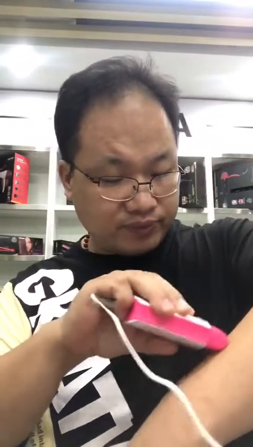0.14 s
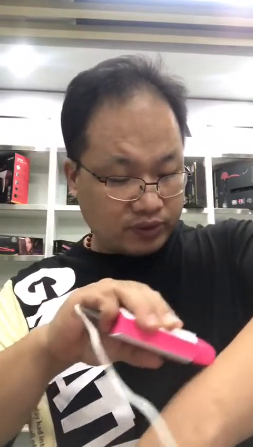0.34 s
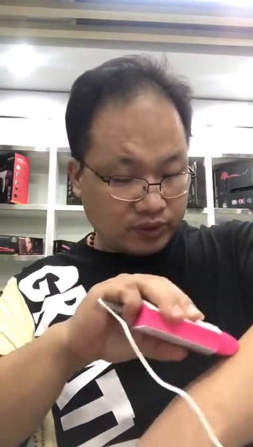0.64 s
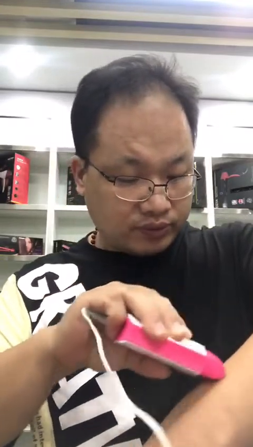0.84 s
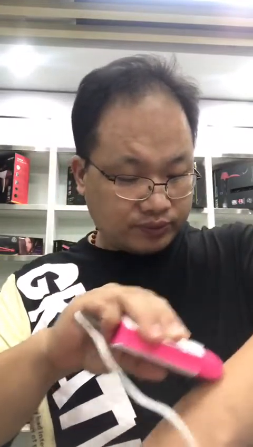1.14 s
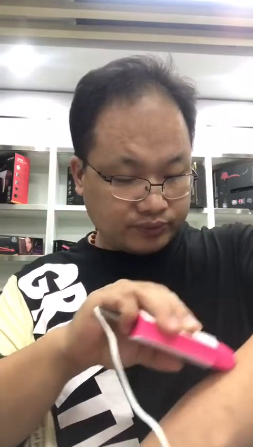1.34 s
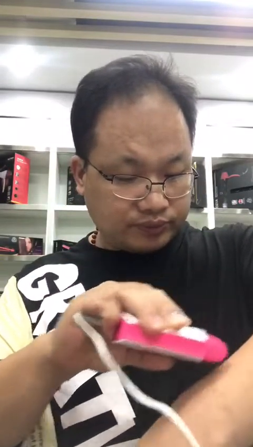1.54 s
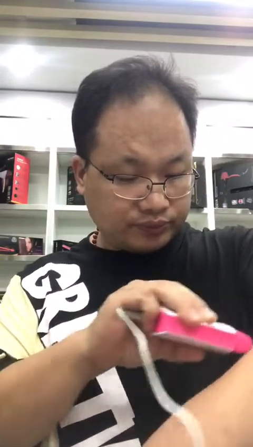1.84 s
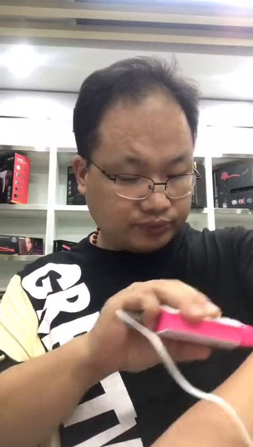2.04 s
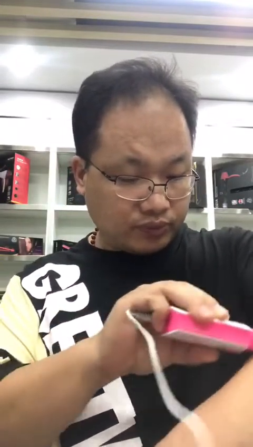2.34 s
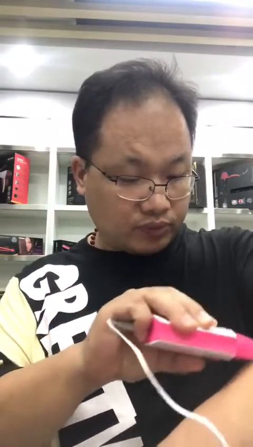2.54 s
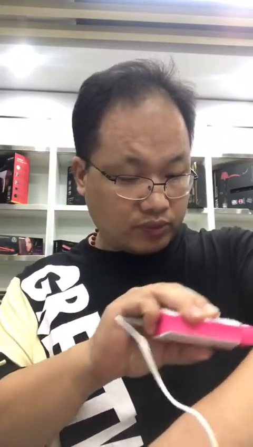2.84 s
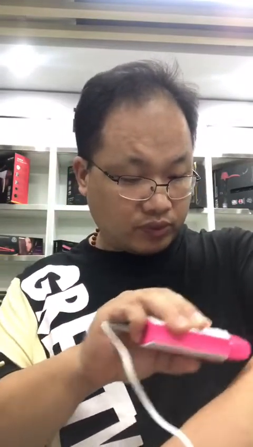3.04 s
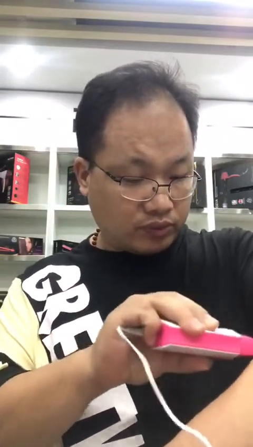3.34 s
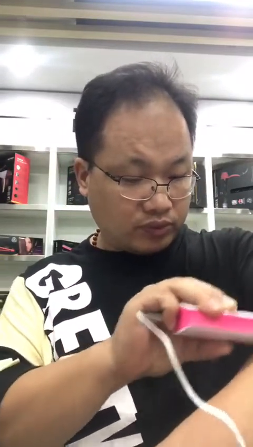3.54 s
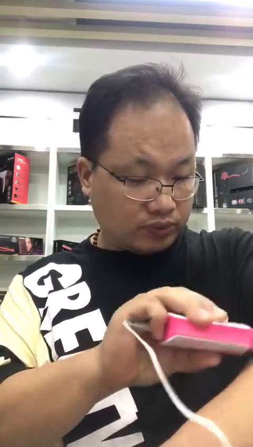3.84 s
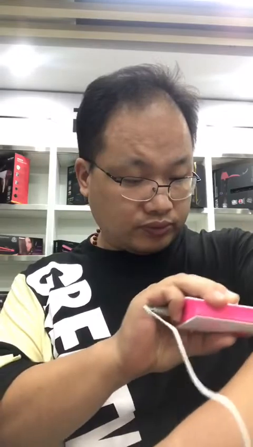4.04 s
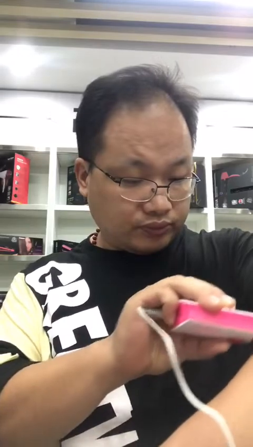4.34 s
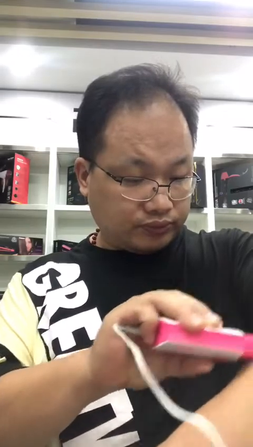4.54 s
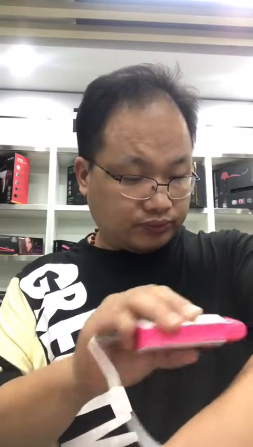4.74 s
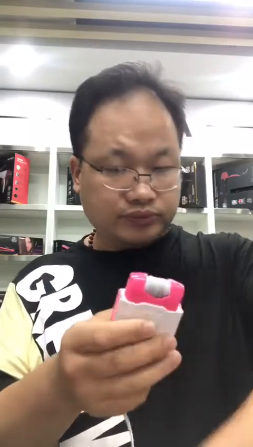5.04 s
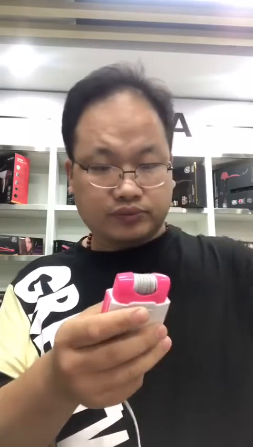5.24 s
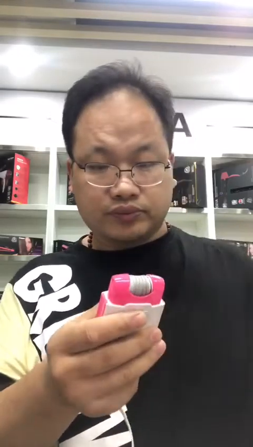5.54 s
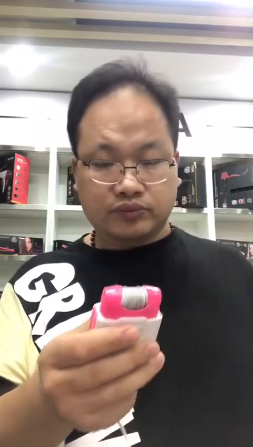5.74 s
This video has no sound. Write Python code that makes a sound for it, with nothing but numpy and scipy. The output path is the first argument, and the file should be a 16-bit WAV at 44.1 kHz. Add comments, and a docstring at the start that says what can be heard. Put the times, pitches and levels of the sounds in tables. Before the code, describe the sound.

A continuous, harsh buzz of tiny plastic gears, with a piercing whine near the top of the voice range and gritty hiss from rollers and tweezers. Short strokes on skin make it swell, rub and dip in pitch. After the last stroke the head faces the microphone, clearer and stronger, until switch-off and a fast falling whirr. Close single microphone, short indoor tail, faint room tone.

```python
"""A buzzing, whining geared epilator strokes along a forearm in a small room, heard by one close microphone.
Pinion teeth whine on their wheel and rattle the plastic casing; rollers rub, tweezers ring, the head drones.
Each tone and knock follows one motor shaft, whose speed sags in most presses on the skin.
Near the end the head is lifted and turned toward the microphone; the power is cut and the gears run down."""
import sys
import numpy as np
from scipy import signal
from scipy.fft import rfft, irfft, next_fast_len
from scipy.io import wavfile
from scipy.ndimage import map_coordinates

SR = 44100
rng = np.random.default_rng(int(sys.argv[2]) if len(sys.argv) > 2 else 0)


def master(y):
    """Save y as 16-bit WAV."""
    cut = np.clip(np.atleast_2d(y).T, -1, 1)
    pcm = np.round(cut * 32767)  # scale
    wavfile.write(sys.argv[1], SR, pcm.astype(np.int16))


N = 259119
TIME = np.arange(N) / SR
PINION_TEETH, WHEEL_TEETH = 13, 78


def from_db(db):
    """Decibels to gain."""
    return 10 ** (np.asarray(db) / 20)


def rms_one(x):
    """Scale to rms 1."""
    return x / np.sqrt(np.mean(x ** 2) + 1e-20)


def in_time(rows):
    """A curve of (time [s], value) at every sample."""
    return np.interp(TIME, *np.transpose(rows))


def at_hz(points, hz):
    """A spectrum's dB at given frequencies, interpolated along log frequency."""
    points = np.array(points)
    return np.interp(np.log(hz + 1), np.log(points[:, 0]), points[:, 1])


def colour(x, db_at):
    """Filter, without phase shift, by a response given as a function from Hz to dB."""
    size = next_fast_len(N + 4096)
    hz = np.arange(size // 2 + 1) * SR / size
    return irfft(rfft(x, size) * from_db(db_at(hz)), size)[:N]


def drift(rate):
    """Smooth random wander of rms 1 that changes about rate times a second."""
    return rms_one(colour(rng.standard_normal(N), lambda hz: -20 * np.log10(1 + (hz / rate) ** 2)))


def swell(at_s, half_s):
    """A smooth rise and fall of height 1."""
    return np.exp(-((TIME - at_s) / half_s) ** 2)


def dips(times):
    """Gain of a tone that drops out briefly at the given times."""
    depth_db, half_s = 7, .022
    return from_db(-depth_db * sum(swell(at_s, half_s) for at_s in times))


def tone(cycles):
    """A sine of rms 1 that follows a cycle count, from a random phase."""
    return np.sqrt(2) * np.sin(2 * np.pi * (cycles + rng.random()))


def resonant_noise(hz, width_hz):
    """Noise in one resonance with steep skirts, whose centre may move; rms 1."""
    def skirts(f):
        return -10 * np.log10(1 + (2 * f / width_hz) ** 4)
    real, imaginary = (colour(white, skirts) for white in rng.standard_normal((2, N)))
    angle = 2 * np.pi * np.cumsum(hz + np.zeros(N)) / SR
    return rms_one(real * np.cos(angle) + imaginary * np.sin(angle))


def runout(turns, count):
    """Error of an out-of-true wheel: the same bumps on every turn, rms 1."""
    phases = rng.uniform(0, 2 * np.pi, count)
    bumps = 0
    for k in range(1, count + 1):
        bumps = bumps + np.cos(2 * np.pi * k * turns + phases[k - 1]) / np.sqrt(k)
    return rms_one(bumps)


def strokes():
    """Gaussian presses on the skin: speed sag, and swells in dB of rubbing, treble rattle and drone."""
    # strokes over the skin: (firmest press [s], half-length [s], speed sag [turns/s],
    # rubbing swell [dB], treble rattle swell [dB], drone swell [dB])
    presses = [(0.146, 0.054, 2.0, 4.5, 0.75, 1.8), (0.682, 0.067, 0, 3.3, 0.98, 2.4),
               (1.003, 0.062, 0.44, 4.5, 1, 3.5), (1.365, 0.082, 7, 1, 1.9, 15),
               (1.739, 0.07, 0.5, 6, 2.1, 8.9), (2.378, 0.09, 0.9, 3.5, 1.7, 2.9),
               (2.701, 0.041, 1.5, 0, 1.1, 5), (3.043, 0.063, 0, 0, 1, 5.8),
               (3.576, 0.046, 3.5, 1, 1.27, 4.5), (3.992, 0.072, 0.1, -1, 0.76, 7.9),
               (4.392, 0.055, 3.5, -1, 0.47, 8), (4.722, 0.068, 0, 3, 1, 1)]
    # the tweezers meet the hair just before each press and brighten the rattle
    catch_lead_s, catch_half_s = 0.12, 0.1
    sag = rubbing_db = catching_db = droning_db = 0
    for at_s, half_s, sag_turns, rub_db, catch_db, drone_db in presses:
        press = swell(at_s, half_s)
        sag = sag + sag_turns * press
        rubbing_db = rubbing_db + rub_db * press
        droning_db = droning_db + drone_db * press
        catching_db = catching_db + catch_db * swell(at_s - catch_lead_s, catch_half_s)
    return sag, rubbing_db, catching_db, droning_db


def run_down():
    """Turns per second lost after the power is cut: current dies away, then friction brakes evenly."""
    off_at_s, current_decay_s, braking_turns_per_s2 = 5.629, .06, 880
    off_s = np.maximum(TIME - off_at_s, 0)
    return braking_turns_per_s2 * (off_s - current_decay_s * (1 - np.exp(-off_s / current_decay_s)))


def motor_speed(sag, braked):
    """Shaft speed in turns per second: the free speed less the load's sag and the run-down."""
    # speed of the motor between presses: (time [s], speed [turns/s])
    free_speed = [(0, 209.0), (.36, 207.5), (.63, 208.3), (.75, 209.2), (.89, 207.4), (.98, 208.5),
                  (1.12, 207.2), (1.62, 208.9), (2.12, 208.0), (2.45, 207.3), (2.98, 206.5), (3.45, 208.7),
                  (3.75, 207.4), (4.19, 207.0), (4.69, 209.2), (5.03, 207.2), (5.22, 208.1), (5.46, 206.3),
                  (5.56, 206.7), (5.63, 206.0)]
    return in_time(free_speed) - sag - braked


def head_facing():
    """How far the lifted, open head is turned toward the microphone."""
    # turn of the head: (time [s], share from side-on to head-on [0-1])
    facing = [(0, 0.02), (4.5, 0.26), (4.8, 0.23), (5.05, 0.56), (5.3, 0.75), (5.55, 0.73), (5.72, 0.75),
              (5.88, 0.78)]
    return np.clip(in_time(facing), 0, 1)


def tooth_knocks(turns, chance_db=3.5):
    """One knock per tooth; backlash scatters each in time and strength. Rms 1."""
    teeth = turns * PINION_TEETH
    count = int(teeth[-1])
    at = np.searchsorted(teeth, np.arange(count) + rng.random(count))
    knocks = np.zeros(N)
    knocks[at] = from_db(chance_db * rng.standard_normal(len(at))) * rng.choice([-1, 1], len(at))
    return rms_one(knocks)


def wheel_rasp(turns, top_hz=1600):
    """The wheel's rough flanks come round again and again: an even comb of low lines."""
    flanks = irfft(np.exp(2j * np.pi * rng.random(size=160)), 8192)
    place = turns * PINION_TEETH / WHEEL_TEETH % 1
    rasp = np.interp(place, np.arange(len(flanks)) / len(flanks), flanks)
    return colour(rms_one(rasp), lambda hz: -10 * np.log10(1 + (hz / top_hz) ** 4))


def casing(x, facing):
    """The shell's resonances, blended between side-on and head-on views, each of rms 1 in the treble."""
    # broad colour of the plastic shell: (frequency [Hz], level [dB per Hz])
    broad = [(100, -33), (350, -18.5), (600, -18.5), (800, -12), (1100, -9), (1700, -6.5), (2200, 0),
             (3000, -2), (4000, 1), (6000, -1.5), (7500, -6), (10000, -7), (14000, -13)]
    # resonances and hollows: (frequency [Hz], width [Hz], level side-on [dB], level head-on [dB])
    resonances = [(419.7, 99, -0.5, -21), (1390, 350, 4.5, 1.5), (2140, 230, 0, 6.5), (2690, 440, 3.5, 3),
                  (3030, 240, -2, -0.5), (3100, 1150, -0.5, 6), (4000, 320, -3.5, 0.5),
                  (4680, 150, -0.5, 4.5), (4920, 280, -4.5, 1), (5410, 330, 0.5, 9), (6600, 1000, 1.5, 2.5),
                  (7570, 320, -6.5, 4), (8980, 520, 0.5, 8), (9780, 230, 1, -5), (10430, 320, -10, 0),
                  (11700, 1200, -1.5, 6)]
    treble_band = signal.butter(4, [3200, 13000], "band", fs=SR, output="sos")
    views = []
    for view in range(2):
        def response(hz):
            db = at_hz(broad, hz)
            for row in resonances:
                db = db + row[2 + view] * .5 ** ((2 * (hz - row[0]) / row[1]) ** 2)
            return db
        sound = colour(x, response)
        views.append(sound / np.std(signal.sosfilt(treble_band, sound)))
    return (1 - facing) * views[0] + facing * views[1]


def gear_rattle(turns, facing, sliding=0.99, rasp=0.36):
    """Teeth knock, slide and rasp in the casing as the wheel's load swings; tweezers snap at random."""
    wheel_db, snaps_per_s, snap_size = .2, 10, 5
    # base level, its loss as the hand moves along the arm, and its gain head-on
    rattle_db, fall_db_per_s, facing_db = -47.5, 0.3854, 7
    snaps = (rng.random(N) < snaps_per_s / SR) * snap_size * rng.uniform(.5, 1.5, N)
    force = tooth_knocks(turns) + sliding * rng.standard_normal(N) + rasp * wheel_rasp(turns) + snaps
    load_db = wheel_db * runout(turns * PINION_TEETH / WHEEL_TEETH, count=2)
    level_db = rattle_db - fall_db_per_s * TIME + facing_db * facing
    return from_db(level_db + load_db) * casing(force, facing)


def brighten(x, lift_db, above_hz=1100):
    """The tweezers catch hair and raise the treble by a level that changes in time."""
    treble = colour(x, lambda hz: -20 * np.log10(1 + (above_hz / (hz + 1)) ** 2))
    return x + (from_db(lift_db) - 1) * treble


def grinding(turns):
    """Gain of the grind: the gears bite once a motor turn, hard and soft in turn."""
    hard_db, soft_db, decay_turns = 3.0, .7, .2
    bite_db = np.where(turns % 2 < 1, hard_db, soft_db) * np.exp(-(turns % 1) / decay_turns)
    return from_db(bite_db - bite_db.mean())


def mesh_chatter(turns, facing, sag, width_hz=290):
    """Backlash roughens the whine: a faint band glides just under the pinion's mesh, louder under load."""
    chatter_db, head_on_db, db_per_sag, below_hz = -64, 11.5, 1.5, 15
    mesh_hz = PINION_TEETH * np.gradient(turns) * SR
    level_db = chatter_db + head_on_db * facing + db_per_sag * sag
    return from_db(level_db) * resonant_noise(hz=mesh_hz - below_hz, width_hz=width_hz)


def pinion_whine(turns, facing, sag, trim_db=-0.5):
    """Mesh tone of the pinion; its out-of-true wheel loosens contact unevenly, so it throbs, most off the skin."""
    # swells and fades as the device is turned, before the trim: (time [s], level [dB])
    whine = [(0, -47.5), (.25, -51), (.75, -52.5), (1.19, -50), (1.45, -53), (1.65, -53.5), (1.77, -49.5),
             (1.9, -65), (2.08, -56), (2.2, -52), (2.41, -56), (2.65, -49), (2.82, -61), (2.99, -46),
             (3.23, -61.5), (3.4, -52), (3.8, -55.5), (4.62, -54), (4.73, -56), (4.81, -72), (4.89, -54),
             (5.02, -46), (5.42, -43), (5.62, -48)]
    # out-of-true wheel: (offset from the mesh [cycles per wheel turn], level before play [dB re whine])
    sidebands = [(-4.5, -24), (-3, -18), (-2, -12), (-1, -11), (1, -14), (2, -20), (3, -18.5), (4.5, -22)]
    # brief drop-outs: (time [s])
    dropouts = [.07, .23, .88, .97, 1.68, 2.07, 2.42, 2.7, 3.53, 3.86, 4.37, 4.5]
    uneven, jitter_rad = .15, .04   # the jitter is scaled by the play
    play = .5 + .6 * facing
    wheel = turns * PINION_TEETH / WHEEL_TEETH
    lapse = sum(from_db(db) * np.exp(2j * np.pi * order * wheel) for order, db in sidebands)
    contact = 1 - play * lapse * (1 + uneven * drift(25))
    phase = 2 * np.pi * PINION_TEETH * turns + play * jitter_rad * drift(90)
    mesh = np.sqrt(2) * np.real(contact * np.exp(1j * phase))
    clean = from_db(in_time(whine) + trim_db) * dips(dropouts) * mesh
    return clean + np.abs(contact) ** 2 * mesh_chatter(turns, facing, sag)


def head_whirr(turns, trim_db=0.6, rough=0.16):
    """Tone of the second gear stage, in the head, with a wavering, rough level."""
    # before the trim and waver: (time [s], level [dB])
    whirr = [(0, -72), (.14, -59), (.4, -60.5), (.75, -61.5), (.9, -67), (1.1, -59), (1.25, -63),
             (1.5, -58), (1.68, -64), (1.92, -56), (2.5, -63.5), (3.2, -60), (3.42, -57), (3.6, -61),
             (4.15, -65.5), (4.45, -63), (4.62, -62), (4.86, -57), (5.0, -64), (5.5, -70), (5.62, -81)]
    # brief drop-outs: (time [s])
    dropouts = [.23, .88, .98, 1.2, 3.82, 4.99, 5.24]
    waver_db, cycles_per_turn = 1.5, 26 / 3
    level = from_db(in_time(whirr) + trim_db + waver_db * drift(9.3)) * dips(dropouts)
    return level * (1 + rough * drift(30)) * tone(cycles_per_turn * turns)


def gear_whine(turns, facing, sag, braked):
    """Both mesh tones weaken under load; in the run-down they hold at first, then fade."""
    loss_db_per_sag = 0.13       # for each turn per second lost under load
    fade_turns_per_s = 12        # 1 dB down at this speed loss, growing with its square
    loss_db = loss_db_per_sag * sag + (braked / fade_turns_per_s) ** 2
    return from_db(-loss_db) * (pinion_whine(turns, facing, sag) + head_whirr(turns))


def rollers(turns, rubbing_db, trim_db=-0.6):
    """Dry, gritty rubbing in one moving resonance of the head, swelling once a roller turn."""
    # rubbing between presses, before the trim: (time [s], level [dB])
    rub = [(0, -56), (.5, -49), (.82, -54), (1.15, -50.5), (1.45, -49.5), (1.68, -58), (1.95, -53.5),
           (2.7, -51.5), (3.1, -53), (3.3, -54.5), (3.9, -50.5), (4.1, -50), (4.5, -52), (4.73, -55),
           (4.82, -69), (5.0, -55), (5.3, -54.5), (5.7, -53), (5.8, -59)]
    # pitch of the rubbing, which shifts with the angle of the head on the skin: (time [s], centre [Hz])
    rub_pitch = [(0, 3950), (.42, 4136), (.65, 3970), (.85, 4300), (1.05, 4130), (1.3, 4300), (1.52, 4230),
                 (1.7, 4400), (1.95, 4250), (2.45, 4206), (2.68, 4052), (3.05, 4020), (3.35, 4350),
                 (3.58, 4127), (3.8, 4260), (4.42, 4296), (4.6, 3930), (4.75, 3825), (5.0, 4450),
                 (5.68, 4450)]
    roller_db, grit_db = 1.3, 1.5
    grain = from_db(roller_db * runout(turns / 4, count=1) + grit_db * drift(160))
    level = from_db(in_time(rub) + trim_db + rubbing_db)
    return level * grain * resonant_noise(hz=in_time(rub_pitch), width_hz=650)


def tweezer_ring(ring_db=0.0):
    """The small steel tweezers ring in one high resonance."""
    # high ring before the other gains: (time [s], level [dB])
    ring = [(0, -58), (.4, -53.5), (.75, -56), (1.0, -58), (1.22, -57), (1.4, -63), (1.58, -53.5),
            (1.95, -65), (2.25, -57), (2.6, -57), (3.35, -57), (3.7, -68), (4.3, -65), (4.75, -60),
            (5.25, -54.5), (5.7, -60)]
    return from_db(in_time(ring) + ring_db) * resonant_noise(hz=6480, width_hz=640)


def coasting(speed):
    """Gain of rattle, rubbing and ring: it falls with a power of the speed, toward a resting share."""
    power, rest = 3.7, 0.52
    return rest + (1 - rest) * (speed / speed.max()) ** power


def head_drone(turns, speed, facing, droning_db, trim_db=-8.0, head_on_db=2.4):
    """The hollow head rings with the motor's fourth harmonic, while in tune, and with noise around it."""
    # between presses, swelling when the head is clear of the arm; before the trim: (time [s], level [dB])
    drone = [(0, -70), (.25, -71), (.38, -59), (.8, -68.5), (1.2, -69), (1.5, -72), (1.62, -60),
             (1.75, -69), (1.93, -73), (2.2, -59.5), (2.55, -64), (2.85, -66), (2.96, -61), (3.1, -77),
             (3.3, -82), (3.5, -63), (3.95, -69), (4.2, -66), (4.35, -67), (4.62, -65.5), (5.04, -52),
             (5.2, -55), (5.65, -58.5), (5.88, -64)]
    air_db, air_head_on_db, waver_db = -5, 6, 1
    in_tune = (speed / speed.max()) ** 8
    fourth_db = head_on_db * facing + waver_db * (1 - facing) * drift(14)
    fourth = from_db(fourth_db) * in_tune * tone(4 * turns)
    air = from_db(air_db + air_head_on_db * facing) * resonant_noise(hz=779, width_hz=250)
    return from_db(in_time(drone) + trim_db + droning_db) * (fourth + air)


def fifth_harmonic(turns, speed, fifth_db=0.0):
    """The motor's fifth harmonic leaks from the head too, as a clean line that fades with the speed."""
    # fifth harmonic before the fade with speed: (time [s], level [dB])
    fifth = [(0, -73), (.4, -72), (.8, -79), (1.3, -65.5), (1.5, -74), (1.72, -65), (1.95, -74), (2.4, -71),
             (2.9, -67), (3.3, -80), (3.6, -69), (4.05, -71), (4.8, -69), (5.2, -61.5), (5.62, -71)]
    return from_db(in_time(fifth) + fifth_db) * (speed / speed.max()) ** 7 * tone(5 * turns)


def motor_hum(turns, speed, facing, droning_db):
    """Weak tones of rotor and gears, locked to the shaft, waver, swell under presses and fade with speed."""
    # tones of rotor and gears: (frequency [cycles per motor turn])
    orders = [2, 7 / 3, 10 / 3, 13 / 3, 6, 7, 9.42, 13.755]
    # their levels before waver, swell and fade: (side-on [dB], head-on [dB])
    levels = [(-77, -88), (-80, -94), (-84, -94), (-77, -76), (-71, -68.5), (-66.5, -74), (-66.5, -73),
              (-68, -70)]
    waver_db, drone_share = 1.6, 0.19   # the share of the drone's swell that these tones follow
    out = 0
    for order, (side_db, head_db) in zip(orders, levels):
        level_db = side_db + facing * (head_db - side_db) + waver_db * drift(19.0)
        out = out + from_db(level_db) * tone(order * turns)
    return out * from_db(drone_share * droning_db) * (speed / speed.max()) ** 7


def arm_echo(x, path_s=0.001106, sweep=0.205, share=0.24):
    """The nearby arm reflects the sound; its randomly drifting path sweeps a shallow comb through it."""
    lag = path_s * SR * np.exp(sweep * drift(1.34))
    return x + share * map_coordinates(x, [np.arange(N) - lag], order=3)


def lift_band(x, lift_db, hz, width_hz):
    """Raise or lower one band by a level that changes in time."""
    band = colour(x, lambda f: -6 * (2 * (f - hz) / width_hz) ** 2)
    return x + (from_db(lift_db) - 1) * band


def shifting_colour(x):
    """As the device tilts, a hollow above the rubbing opens and closes and a low shell ring comes and goes."""
    # band just above the rubbing: (time [s], level [dB])
    hollow = [(0, 0.5), (.75, -1.5), (.9, -8), (1.05, -1), (1.48, -8), (1.62, 2), (1.9, 1), (2.35, -2),
              (2.55, 0.5), (2.75, -1), (3.0, 1.5), (3.6, -0.5), (4.2, -4), (4.7, 3), (5.1, 1)]
    # low ring of the shell: (time [s], level [dB])
    shell_ring = [(0, -0.5), (2.0, -2.5), (2.3, 2), (3.1, 1.5), (3.3, -1.5), (4.4, 0), (4.65, 3.5),
                  (5.0, -2), (5.5, -1), (5.75, -11)]
    hollowed = lift_band(x, in_time(hollow), hz=4870, width_hz=510)
    return lift_band(hollowed, in_time(shell_ring), hz=2190, width_hz=420)


def shimmer(x, above_hz=10500, depth_db=2.0):
    """The top of the hiss flickers."""
    top = colour(x, lambda hz: -10 * np.log10(1 + (above_hz / (hz + 1)) ** 16))
    return x + (from_db(depth_db * drift(9.6)) - 1) * top


def room(x, t60=0.15):
    """A short diffuse tail from shelves and walls: decaying noise after a 5 ms gap."""
    t = TIME[:SR // 2]
    tail = rng.standard_normal(len(t)) * from_db(-60 * t / t60) * (t > .005)
    return signal.fftconvolve(x, tail / np.linalg.norm(tail))[:N]


def room_tone(level_db=-68):
    """Steady background of the room: coloured noise."""
    # shape of the background: (frequency [Hz], relative level [dB per Hz])
    spectrum = [(20, -36), (35, -11), (48, 2), (70, -1.5), (95, 1), (125, -2.5), (220, -4), (450, -7),
                (1000, -18), (4000, -27.5), (14000, -30.5)]
    noise = colour(rng.standard_normal(N), lambda hz: at_hz(spectrum, hz))
    return from_db(level_db) * rms_one(noise)


def scene(noise_wet_db=-12):
    """One shaft drives the gears and motor tones; both channels carry the same microphone."""
    tone_wet_db = -24
    sag, rubbing_db, catching_db, droning_db = strokes()
    braked, facing = run_down(), head_facing()
    speed = motor_speed(sag, braked)
    turns = np.cumsum(speed) / SR

    rattle = brighten(gear_rattle(turns, facing), catching_db)
    friction = rattle + rollers(turns, rubbing_db) + tweezer_ring()
    ground = coasting(speed) * grinding(turns) * friction
    noises = shimmer(shifting_colour(arm_echo(ground)))

    drone = head_drone(turns, speed, facing, droning_db)
    hum = fifth_harmonic(turns, speed) + motor_hum(turns, speed, facing, droning_db)
    tones = gear_whine(turns, facing, sag, braked) + drone + hum

    tail = room(from_db(noise_wet_db) * noises + from_db(tone_wet_db) * tones)
    return np.tile(noises + tones + tail + room_tone(), (2, 1))


def record(dry):
    """The top is cut steeply."""
    cutoff_hz = 14200
    return signal.sosfilt(signal.ellip(12, .1, 80, cutoff_hz, fs=SR, output="sos"), dry)


dry = scene()
out = record(dry)
master(out)
```